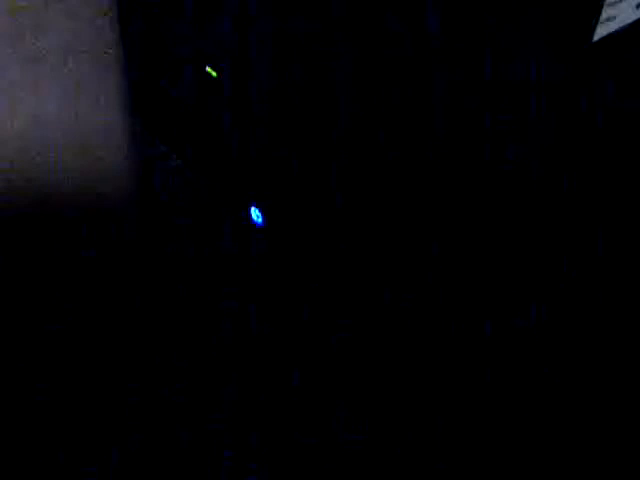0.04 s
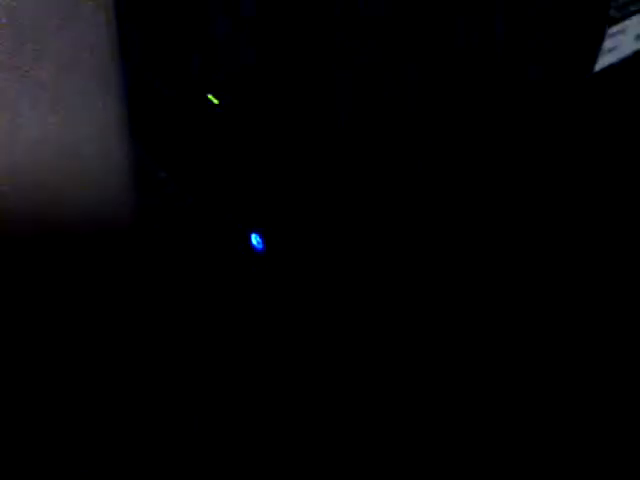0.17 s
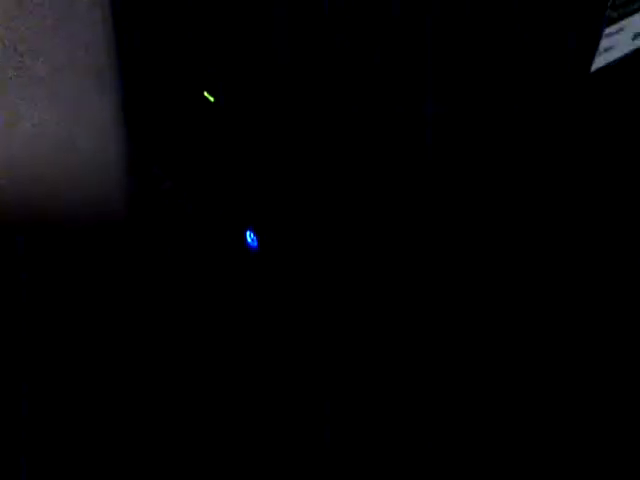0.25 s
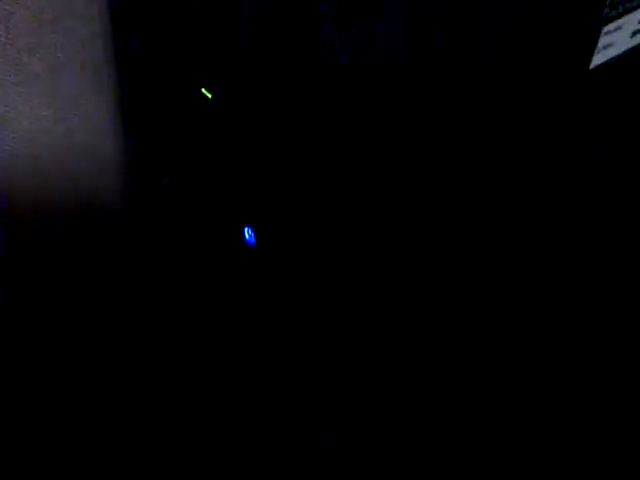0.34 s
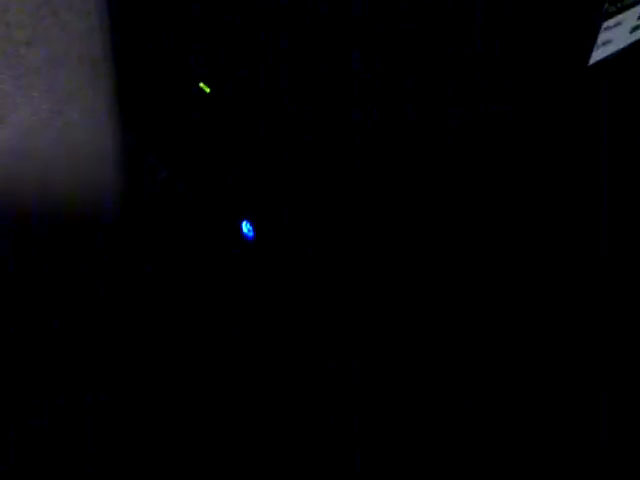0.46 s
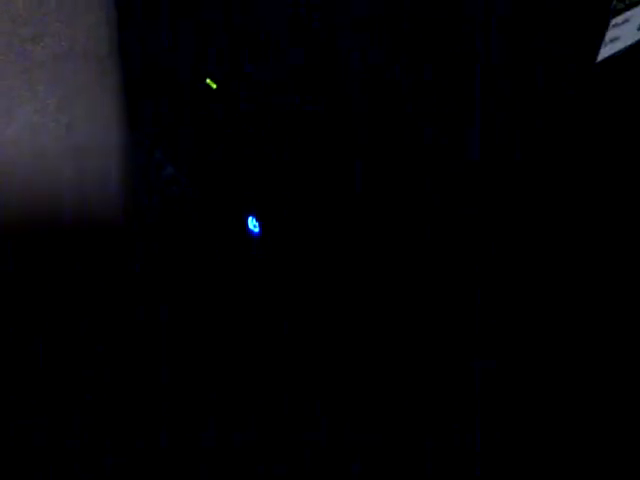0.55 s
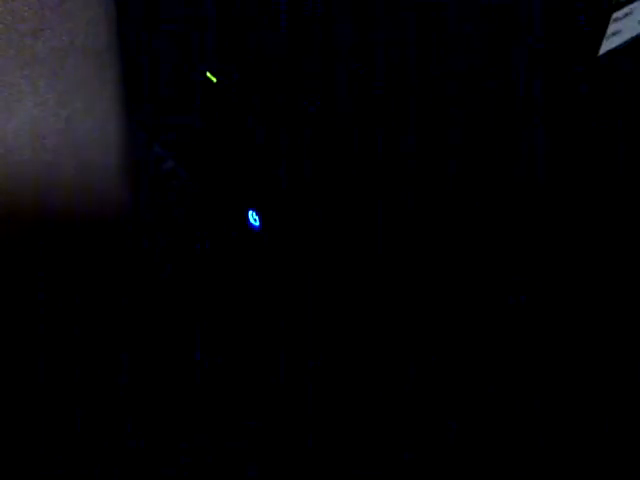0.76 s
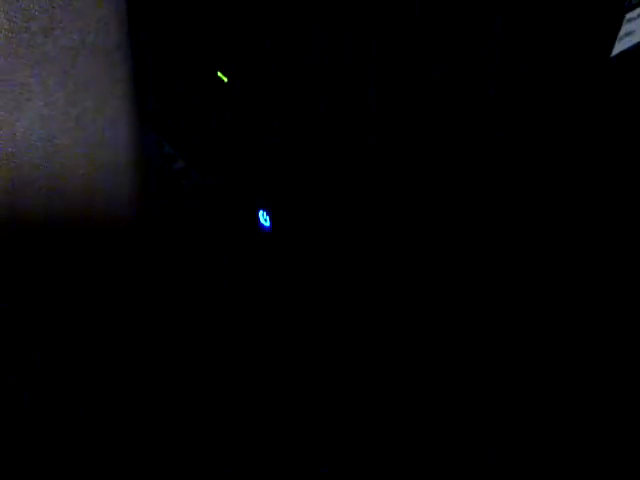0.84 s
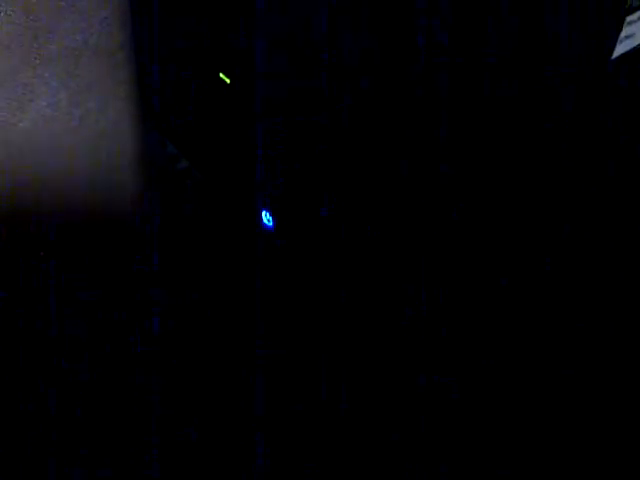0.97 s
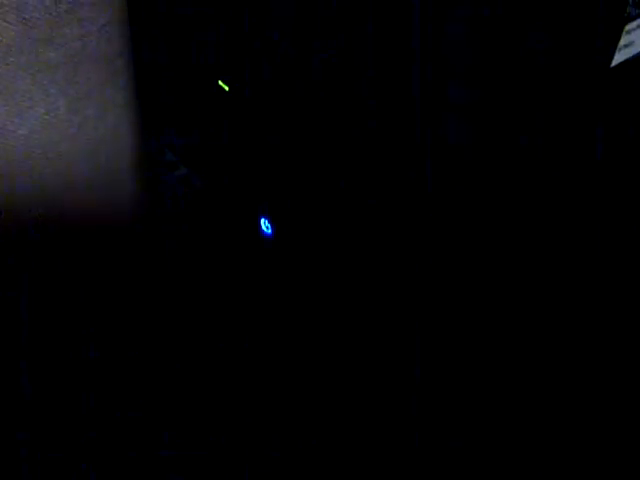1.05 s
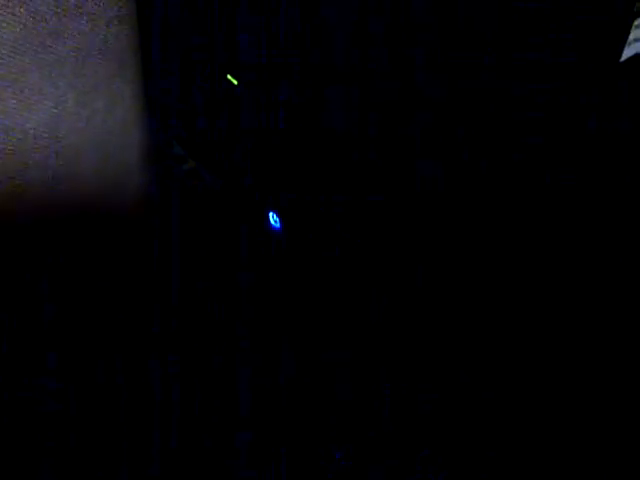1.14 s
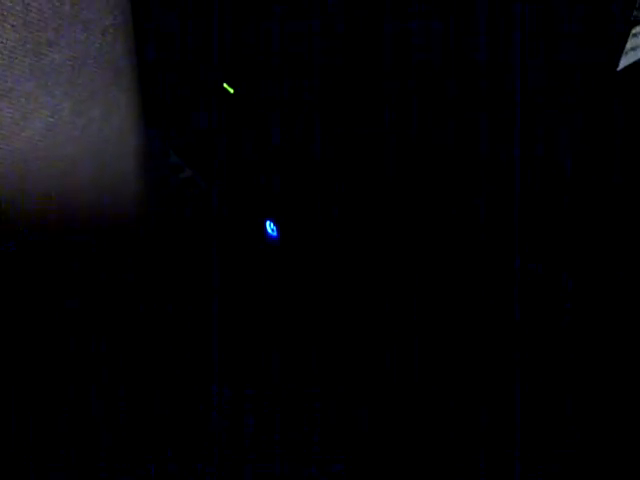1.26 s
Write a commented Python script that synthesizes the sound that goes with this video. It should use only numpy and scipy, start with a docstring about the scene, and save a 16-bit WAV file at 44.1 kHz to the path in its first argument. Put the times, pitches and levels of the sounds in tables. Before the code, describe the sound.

A floppy drive's head motor buzzes in a quiet room, close and mono. Silence until 0.16 s, when a sharp pop and dull thump cut into a buzz ending about 0.26 s. The same steady, raspy low pitch returns from 0.49 to 0.79 s, two small ticks fall at 0.90 and 0.96 s, and a third buzz runs 1.02 to 1.33 s. The chassis rings briefly after each, over faint hiss and mains hum.

```python
"""Floppy drive in a quiet room

One channel, as from a single close microphone: the room's tail lies well below the direct sound.
The head motor buzzes in three bursts on one pitch, a stack of steady lines with a rasp of noise in each cycle.
The sound cuts in during the first burst with a sharp pop and a thump; two small ticks fall in the second pause.
The chassis rings on briefly after each burst, over faint hiss and mains hum."""
import sys
import numpy as np
from scipy import signal
from scipy.fft import rfft, irfft
from scipy.io import wavfile
from scipy.ndimage import uniform_filter1d

SR = 44100
rng = np.random.default_rng(int(sys.argv[2]) if len(sys.argv) > 2 else 0)


def to_wav(sig):
    """Store sig (one row per channel, or 1-D mono) as 16-bit WAV at the path in sys.argv[1].

    Samples outside -1..1 are clipped; the rate is SR.
    """
    pcm = np.clip(np.atleast_2d(sig), -1, 1) * 32767
    pcm = np.round(pcm).astype(np.int16)
    wavfile.write(sys.argv[1], SR, pcm.T)  # frames by channels


N = 57330  # length in samples
T = np.arange(N) / SR  # time in seconds


def amp(db):
    """Decibels to gain."""
    return 10 ** (np.asarray(db) / 20)


def unit(x):
    """Scales to rms 1."""
    return x / np.sqrt(np.mean(x ** 2) + 1e-20)


def read(points, hz):
    """Reads a table on a log-frequency axis."""
    f, value = np.transpose(points)
    return np.interp(np.log(hz + 1), np.log(f + 1), value)


def decay(t, t60):
    """Exponential decay by 60 dB in t60 seconds."""
    return np.exp(-np.log(1000) * t / t60)


def noise(colour):
    """Noise of a given spectrum, at rms 1."""
    gain = amp(read(colour, np.fft.rfftfreq(N, 1 / SR)))
    return unit(irfft(rfft(rng.standard_normal(N)) * gain, N))


def click(s, db, colour, size=4096):
    """One causal impulse of a given spectrum and peak level, starting at s seconds."""
    log_gain = np.log(amp(read(colour, abs(np.fft.fftfreq(size, 1 / SR)))))
    # minimum phase: all the energy comes as early as the spectrum allows
    spectrum = np.exp(np.conj(signal.hilbert(log_gain)))
    shape = np.fft.ifft(spectrum).real[:size // 2]
    shape = shape / abs(shape).max()
    return amp(db) * np.interp(T - s, T[:len(shape)], shape, left=0, right=0)


# Colour of the hiss. Each row: frequency in Hz, relative density in dB per Hz.
AIR_COLOUR = [(15, -21), (36, 3), (55, -7), (80, -11.5), (130, -5), (180, -5.5), (290, 0), (450, -4.5),
              (620, -3.5), (900, -11), (1300, -10), (1600, -11), (2700, -18), (3400, -17.5), (4200, -17.5),
              (6400, -15.5), (8000, -24), (8800, -42.5)]
# Mains hum. Each row: frequency in Hz, level in dB rms.
HUM_LINES = [(119.5, -70), (179, -72.5), (240, -72)]
AIR_DB = -60.5  # rms


def background():
    """Steady hiss and mains hum, the hum as pure tones of random phase."""
    hum = np.zeros(N)
    for hz, db in HUM_LINES:
        hum += amp(db) * np.sqrt(2) * np.sin(2 * np.pi * (hz * T + rng.random()))
    return amp(AIR_DB) * noise(AIR_COLOUR) + hum


# Decay of the room. Each row: frequency in Hz, t60 in seconds.
ROOM_T60 = [(150, .4), (600, .3), (2000, .22), (8000, .12)]
ROOM_DB = -16  # energy of the tail against the direct sound


def room(x):
    """A diffuse tail whose treble dies first."""
    hz, t, z = signal.stft(rng.standard_normal(SR // 2), SR, nperseg=256)
    t60 = read(ROOM_T60, hz)[:, None]
    tail = signal.istft(z * decay(t, t60), SR)[1]
    return amp(ROOM_DB) * signal.fftconvolve(x, tail / np.linalg.norm(tail))[:N]


# Colour of the opening pop. Each row: frequency in Hz, relative density in dB per Hz.
POP_COLOUR = [(30, -22.5), (400, 3.5), (800, 3), (1500, -13), (3000, -11.5), (7000, -14), (9000, -22.5)]
# Colour of the thump. Each row: frequency in Hz, relative density in dB per Hz.
THUMP_COLOUR = [(25, -7.5), (120, -2.5), (200, -6), (270, -11), (350, -1), (480, 1.5), (600, 1.5),
                (780, -1.5), (1050, -7), (1300, -19), (2400, -28.5), (3200, -40.5), (4300, -28.5),
                (8000, -58)]
# Small ticks. Each row: start in seconds, peak level in dB before the band limit.
TICKS_AT = [(.8971, -30), (0.9608, -31)]
# Colour of the ticks. Each row: frequency in Hz, relative density in dB per Hz.
TICK_COLOUR = [(100, -19), (900, -9.5), (1600, -4.5), (2200, -0.5), (4300, 1.5), (6000, -2), (7100, -12.5),
               (8000, -42.5)]
POP_S, POP_DB, THUMP_S, THUMP_DB = .158, -18.5, .1611, -7  # starts, peaks before the band limit
BOUNCE_S, BOUNCE_DB = 0.000915, -6.5  # delay and level of the bounce against its tick
# slow settling of the recorder's offset after switch-on: depth, time constant
OFFSET_DB, OFFSET_S = -45, 0.085


def knocks():
    """The dry opening pop and thump, a settling DC offset, and two ticks that each bounce once."""
    ticks = np.zeros(N)
    for s, db in TICKS_AT:
        ticks += click(s, db, TICK_COLOUR)
        ticks += click(s + BOUNCE_S, db + BOUNCE_DB, TICK_COLOUR)
    offset = amp(OFFSET_DB) * (T >= THUMP_S) * np.exp(-np.maximum(T - THUMP_S, 0) / OFFSET_S)
    pop = click(POP_S, POP_DB, POP_COLOUR)
    thump = click(THUMP_S, THUMP_DB, THUMP_COLOUR)
    return pop - thump - offset - ticks


ECHO_S, ECHO_HZ, ECHO_DB, ECHO_WIDTH_HZ = .0581, 611, -6.5, 150


def reflection(hz):
    """Response of the direct path plus a late reflection of the low middle."""
    late = amp(ECHO_DB) * np.exp(-2j * np.pi * hz * ECHO_S)
    return 1 + late / (1 + 2j * (hz - ECHO_HZ) / ECHO_WIDTH_HZ)


def echo(x):
    """The buzz with its late reflection, which partly cancels it while the motor runs."""
    return irfft(rfft(x, 2 * N) * reflection(np.fft.rfftfreq(2 * N, 1 / SR)))[:N]


# How fast the buzz builds up. Each row: frequency in Hz, time constant in seconds.
BUILD_UP = [(120, 0.025), (250, 0.015), (600, .022), (1500, 0.0068), (4500, .008)]
# How long the chassis rings on. Each row: frequency in Hz, t60 in seconds.
RING_T60 = [(120, .2), (250, .28), (380, 0.26), (600, .085), (900, .10), (1500, 0.17), (2500, 0.11),
            (4500, 0.064)]
# Runs of the head motor. Each row: start in seconds, end in seconds, level in dB.
MOTOR_RUNS = [(.080, .263, 0), (0.49, .789, 0), (1.019, 1.33, 0)]


def running(hz):
    """Level at one frequency: builds up while the motor runs, then rings out."""
    build, t60 = read(BUILD_UP, hz), read(RING_T60, hz)
    level = np.zeros(N)
    for start, end, db in MOTOR_RUNS:
        rise = 1 - np.exp(-np.maximum(T - start, 0) / build)
        level += amp(db) * rise * decay(np.maximum(T - end, 0), t60)
    return level


STOP_HZ, STOP_DB, STOP_T60_S, STOP_LAG_S = 242, -50, 0.23, .011


def stops():
    """A low chassis ring, one decaying sine, each time the head comes to rest."""
    out = np.zeros(N)
    for _, end, _ in MOTOR_RUNS:
        age = np.maximum(T - end - STOP_LAG_S, 0)
        out += np.sin(2 * np.pi * STOP_HZ * age) * decay(age, STOP_T60_S)
    return amp(STOP_DB) * out


CYCLE_HZ = 61.06  # motor cycles per second
SWELL_AT_S = .012  # where in the cycle the swell peaks


def swell(t, depth):
    """The motor works harder once in every cycle."""
    return np.exp(depth * np.cos(2 * np.pi * CYCLE_HZ * (t - SWELL_AT_S)))


# Colour of the head carriage's rasp. Each row: frequency in Hz, relative density in dB per Hz.
RASP_COLOUR = [(100, -17.5), (300, -6.5), (700, 3.5), (1200, -3), (1900, 3), (3000, -5.5), (3400, -5.5),
               (4200, -4.5), (5200, -9.5), (7000, -10), (8500, -30)]
RASP_DB, RASP_DEPTH = -59, .45  # rms before the runs shape it; depth of the swell


def carriage():
    """A puff of sliding noise on every motor cycle."""
    puffs = unit(swell(T, RASP_DEPTH) * noise(RASP_COLOUR))
    return amp(RASP_DB) * puffs * running(hz=3000)


def beat_phases(gains, beats, depth, swell_depth, size=512, count=6):
    """Random phases for the orders, drawn together into even beats within the cycle."""
    k, turn = np.arange(1, len(gains) + 1), np.arange(size) / size
    pulses = np.exp(depth * np.cos(2 * np.pi * beats * turn)) * swell(turn / CYCLE_HZ, swell_depth)
    phases = 2 * np.pi * rng.random(len(gains))
    for _ in range(count):
        # impose the pulse envelope on the cycle, then keep only the phases
        cycle = np.fft.ifft(np.r_[0, gains * np.exp(1j * phases)], size)
        phases = np.angle(np.fft.fft(pulses * np.exp(1j * np.angle(cycle)))[k])
    return phases


# What the chassis radiates; four steps make one motor cycle.
# Each row: order as a multiple of the cycle rate, relative level in dB.
ORDERS = [(1, -40), (2, -18), (3, -23), (4, -9), (5, -13), (6, -4), (7, -15), (8, -8), (9, -16), (10, 0),
          (11, -12), (12, -7), (13, -19), (14, -14), (15, -11), (16, -30), (17, -23), (18, -27), (19, -14),
          (20, -17), (21, -19), (22, -29), (23, -13), (24, -7), (25, -14), (26, -14), (27, -15), (28, -18),
          (29, -1), (30, -7), (31, -16), (32, -41), (33, -19), (34, -15), (35, -7), (36, -23), (37, -27),
          (38, -12), (39, -16), (40, -19), (41, -22), (42, -17), (43, -24), (44, -20), (45, -15), (46, -22),
          (47, -28), (48, -13), (49, -28), (50, -24), (51, -17), (52, -21), (53, -37), (54, -37), (55, -43),
          (56, -33), (57, -28), (58, -19), (59, -33), (60, -22), (61, -30), (62, -36), (63, -31), (64, -21),
          (65, -39), (66, -30), (67, -21), (68, -20), (69, -23), (70, -46), (71, -30), (72, -31), (73, -36),
          (74, -28), (75, -30), (76, -28), (77, -34), (78, -37), (79, -37), (80, -40), (81, -30), (82, -36)]
# Beats within one motor cycle: steps and chatter.
# Each row: from Hz, to Hz, beats per cycle, beat depth, depth of one swell per cycle.
BEAT_BANDS = [(0, 1080, 4, 1.2, .1), (1080, 2250, 6, .8, .3), (2250, 3250, 6, .8, 0),
              (3250, 6000, 6, .2, .45)]
BUZZ_DB = -42.5  # rms of the full buzz, reflection included
WAVER = 0.046  # rms share by which each order wavers


def stepper():
    """Evenly timed steps and chatter give a stack of clean, barely wavering lines."""
    k, db = np.transpose(ORDERS)
    lines, gains = k * CYCLE_HZ, amp(db)
    phases = np.zeros(len(lines))
    for low, high, *pattern in BEAT_BANDS:
        band = (lines >= low) & (lines < high)
        phases += band * beat_phases(gains * band, *pattern)
    # the reflection brings each line back to its table level
    sent = gains / abs(reflection(lines))
    out = np.zeros(N)
    for hz, gain, phase in zip(lines, sent, phases):
        waver = 1 + WAVER * unit(uniform_filter1d(rng.standard_normal(N), size=2000))
        out += gain * running(hz) * waver * np.cos(2 * np.pi * hz * T + phase)
    return amp(BUZZ_DB) * out / np.sqrt(np.sum(gains ** 2) / 2)


def scene():
    """The drive in its room, with the dry knocks and the background."""
    drive = echo(stepper() + carriage()) + stops()
    return (drive + room(drive) + knocks() + background())[None]


EDGE_HZ = 8650  # upper band edge


def record(dry):
    """Silence until the pop, then a steep band limit."""
    live = dry * (T >= POP_S)
    lowpass = signal.firwin(255, EDGE_HZ, window=("kaiser", 8), fs=SR)
    return signal.oaconvolve(live, lowpass[None], "same")


dry = scene()
out = record(dry)
to_wav(out)
```